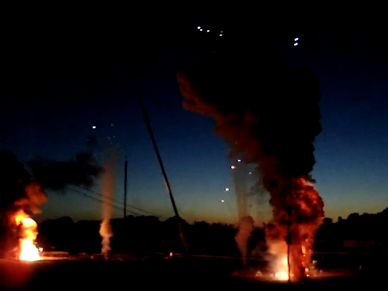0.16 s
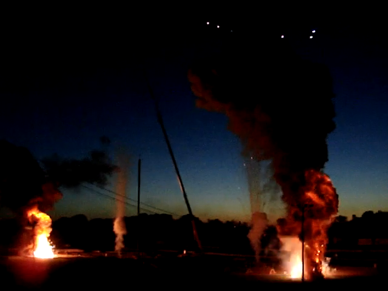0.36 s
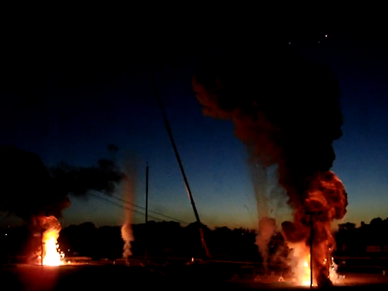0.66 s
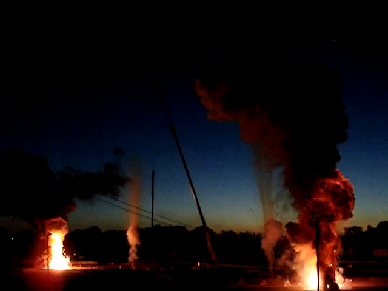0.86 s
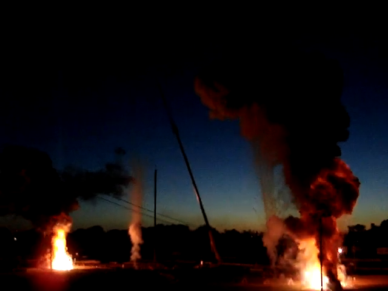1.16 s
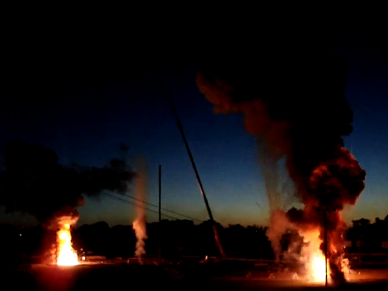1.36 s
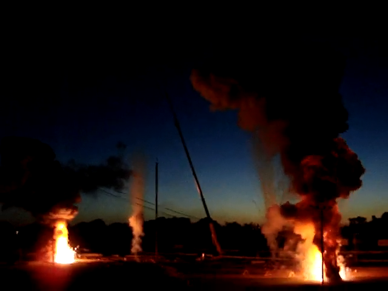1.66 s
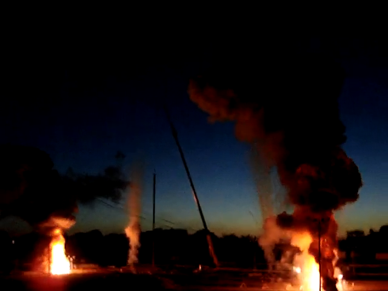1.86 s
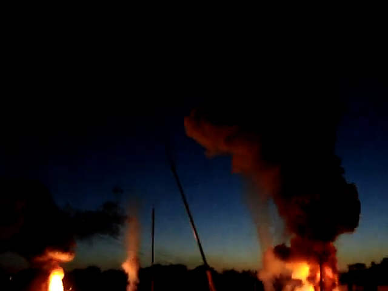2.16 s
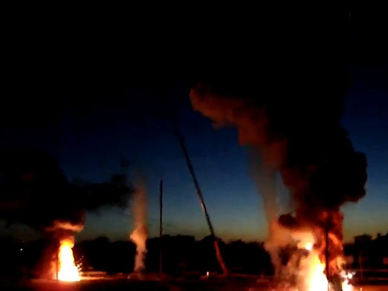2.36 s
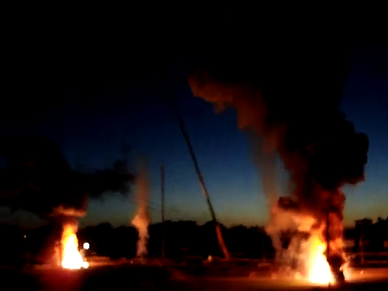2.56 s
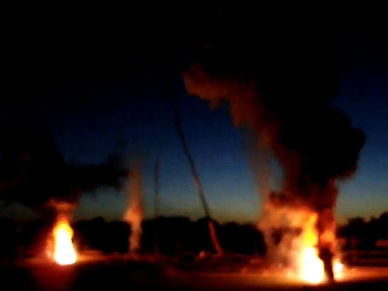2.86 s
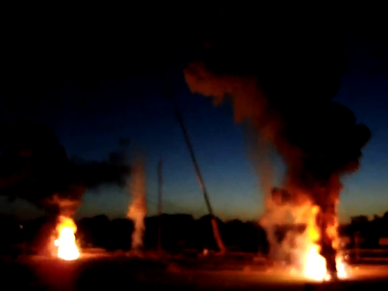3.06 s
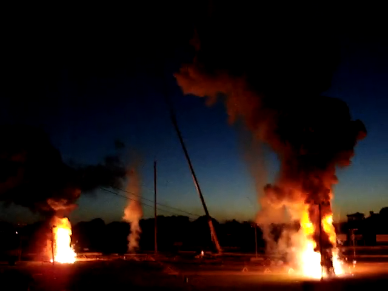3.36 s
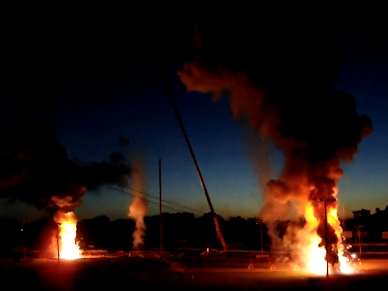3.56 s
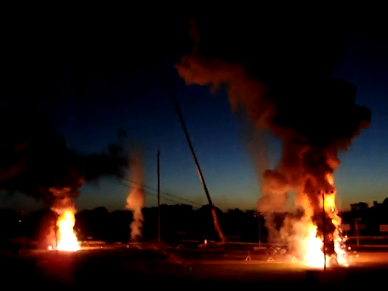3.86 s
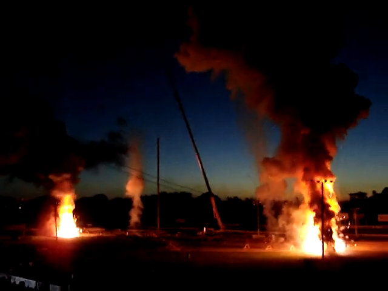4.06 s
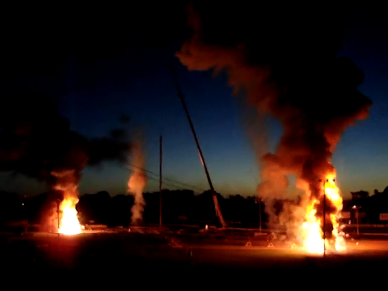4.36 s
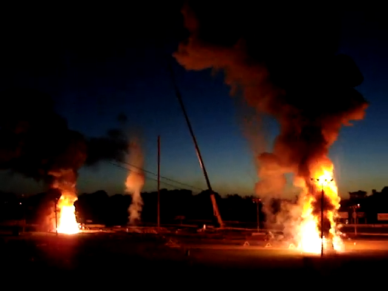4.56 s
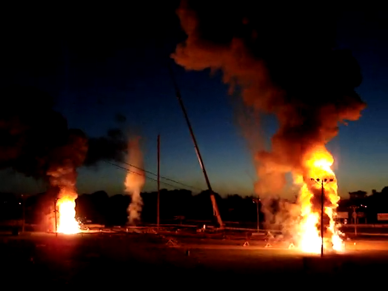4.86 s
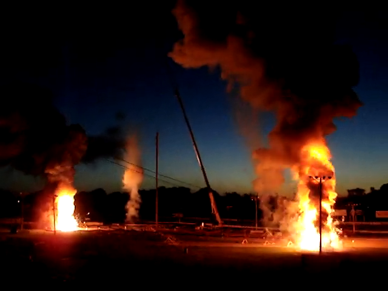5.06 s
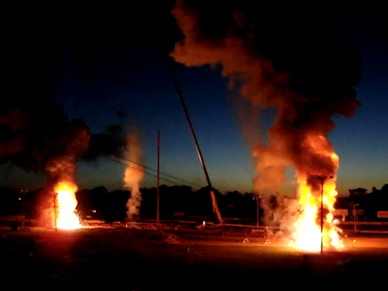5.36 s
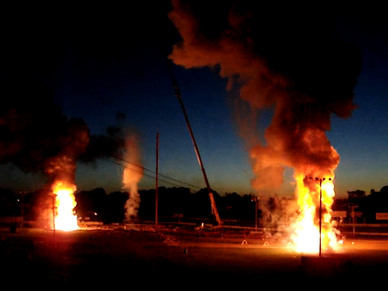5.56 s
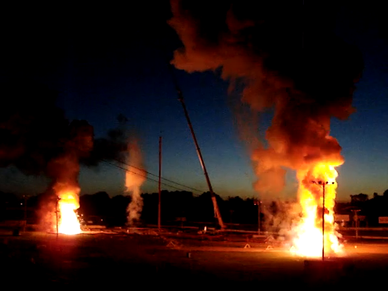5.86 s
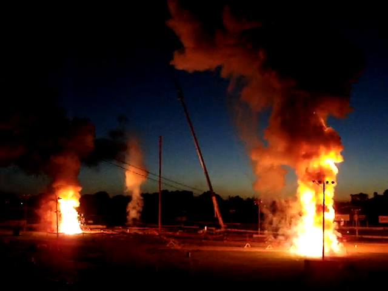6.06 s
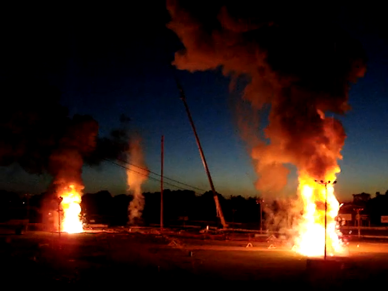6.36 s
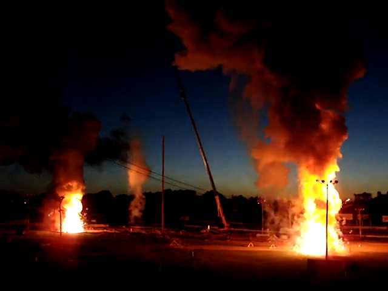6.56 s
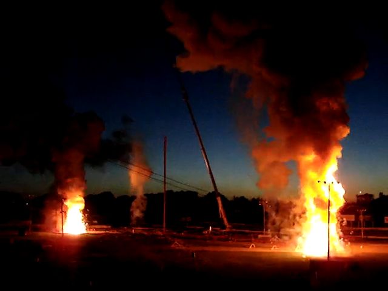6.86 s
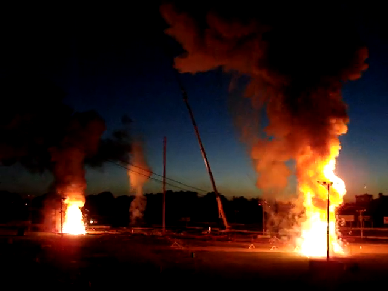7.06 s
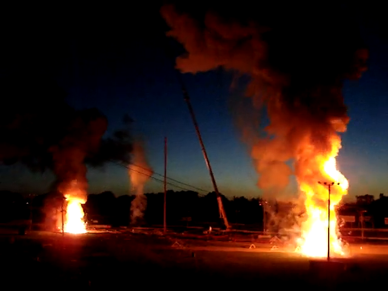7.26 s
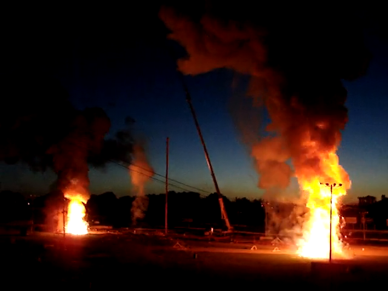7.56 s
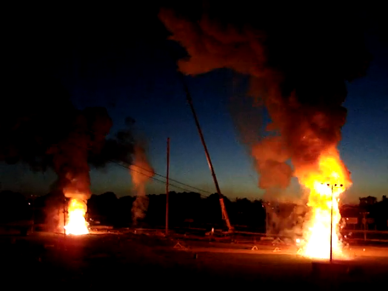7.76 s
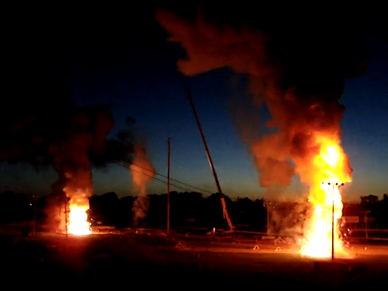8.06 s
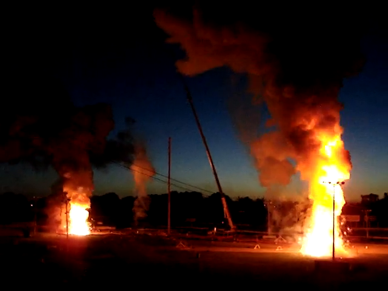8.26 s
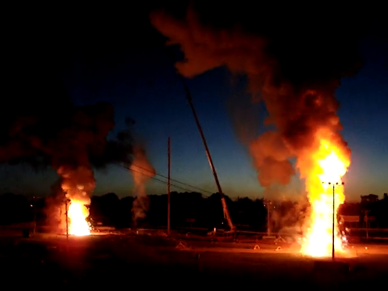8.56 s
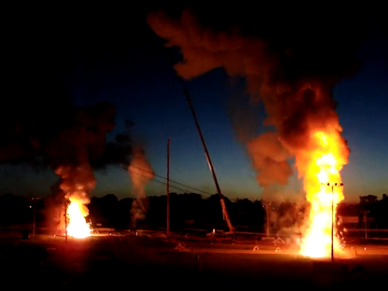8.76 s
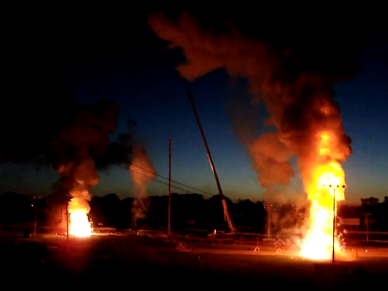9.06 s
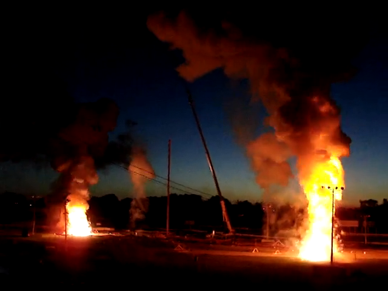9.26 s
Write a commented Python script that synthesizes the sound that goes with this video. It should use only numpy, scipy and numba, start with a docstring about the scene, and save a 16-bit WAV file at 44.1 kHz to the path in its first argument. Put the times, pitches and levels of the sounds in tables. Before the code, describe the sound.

From 0 s, huge hanging strings of firecrackers are already burning at full force on an open field, thousands of dry snaps per second fused into a harsh, dense, ripping roar. Between about 0.15 and 0.9 s eight louder bangs stand out in an uneven cluster, each a short low thump with a brief crack of noise; dull thudding underneath is heaviest here and soon eases. From 1 to 6 s the roar holds nearly steady with tiny random surges, its treble colouring sliding gradually as the camera turns. The nearer cracks slowly blend into the farther mass, becoming smoother and hissier toward 8 s, with a slight dip near 8.4 s. A faint deep rumble swells around 8 s. Near 8.9 s the crackle lifts again, sharper, and continues to the end at about 9.4 s. The small microphone is bass-thin, midrange-heavy and mildly overloaded, with flickering treble and a diffuse outdoor tail.

```python
"""Huge strings of firecrackers

Hanging strings of firecrackers burn on an open field: thousands of random clicks a second merge into a roar.
A few louder bangs, each a low overload thump with a crack of noise, stand out early on; the overload's dull
thudding, made of random pulses, and a rumble lie below. The hand-held camera turns, which shifts the short
reflections and a treble notch in the sound of the strings. Its small microphone cuts their bass, and its
input overloads a little, more on one side of the wave."""
import sys
import numpy as np
from scipy import signal
from scipy.fft import rfft, irfft
from scipy.io import wavfile
from numba import njit

SR = 44100
rng = np.random.default_rng(int(sys.argv[2]) if len(sys.argv) > 2 else 0)


def unload_audio(sound):
    """Save the sound as a 16-bit wav file, at the path given as the first command line argument."""
    columns = np.transpose(np.atleast_2d(sound))
    # keep every value between -1 and 1, then stretch to whole-number steps
    steps = np.round(np.clip(columns, -1, 1) * 32767)
    wavfile.write(sys.argv[1], SR, steps.astype(np.int16))


N = 414540
TIME = np.arange(N) / SR  # seconds


def gain_of(db):
    """Turns decibels into a pressure factor."""
    return 10 ** (np.asarray(db) / 20)


def evened(x):
    """Scales a sound to an average strength (rms) of 1."""
    return x / np.sqrt(np.mean(x ** 2) + 1e-20)


def curve(rows):
    """Joins the values of a table by straight lines in time."""
    times_s, values = np.transpose(rows)
    return np.interp(TIME, times_s, values)


def add(mix, start_s, sound):
    """Lays a sound into the mix at a given time."""
    start = max(round(start_s * SR), 0)
    part = mix[start:][:len(sound)]
    part += sound[:len(part)]


def wander(rate_hz):
    """Makes a random curve of rms 1; changes faster than the given rate are weakened."""
    spectrum = rfft(rng.standard_normal(N))
    freq_hz = np.fft.rfftfreq(N, 1 / SR)
    return evened(irfft(spectrum / (1 + (freq_hz / rate_hz) ** 2), N))


def colour(x, points, size=2048):
    """Filters to a given spectrum without sounding ahead, so that clicks keep their sharp front."""
    pitch_hz, level_db = np.transpose(points)
    freq_hz = abs(np.fft.fftfreq(size, 1 / SR))
    log_gain = np.log(gain_of(np.interp(np.log(freq_hz + 1), np.log(pitch_hz), level_db)))
    # the Hilbert transform gives the phase that puts the energy as early as possible
    taps = np.fft.ifft(np.exp(np.conj(signal.hilbert(log_gain)))).real
    return signal.oaconvolve(x, taps[:size // 2])[:len(x)]


def cut(x, edge_hz, kind, order=2):
    """Keeps what lies above ("high") or below ("low") the edge."""
    sections = signal.butter(order, min(edge_hz, SR / 2 - 1), kind, fs=SR, output="sos")
    return signal.sosfilt(sections, x)


@njit
def smooth(x, keep):
    """Smooths with a one-step memory that may change from sample to sample."""
    out = x.copy()
    for i in range(1, len(x)):
        out[i] = keep[i] * out[i - 1] + (1 - keep[i]) * x[i]
    return out


def resonate(x, centre_hz, width_hz):
    """Picks out a band with gain 1 at a centre that may move: shift it to 0 Hz, smooth, shift back."""
    spin = np.exp(2j * np.pi * np.cumsum(centre_hz) / SR)
    keep = np.exp(-np.pi * abs(width_hz) / SR)
    return 2 * (spin * smooth(x / spin, keep)).real


def random_pulses(per_s, spread_db, clumping, clump_hz, suction=0.57, shortest_s=.0002, longest_s=.002):
    """Pulses of uneven size at random moments, in clumps, as a fuse fires crackers."""
    rate_per_s = per_s * np.exp(clumping * wander(clump_hz))
    size = gain_of(spread_db * np.clip(rng.standard_normal(N), -2, 2))
    fronts = size * (rng.random(N) < rate_per_s / SR)
    # suction follows each front after its own delay, so that cracks differ in colour
    delay = SR * (shortest_s + (longest_s - shortest_s) * rng.random(N))
    arrival = np.arange(N) + delay.astype(int)
    waves = fronts - suction * np.bincount(arrival, fronts)[:N]
    return evened(waves - waves.mean())


# Colour of the overload's low thudding: pitch_hz [Hz], level_db [dB per Hz, relative]
THUD_COLOUR = [(25, -14), (60, -11), (130, -1.5), (185, -9), (260, 1.5), (350, 3.5), (600, -15),
               (2000, -52.5)]
# Level of the deep rumble, which swells late: time_s [s], level_db [dB]
RUMBLE_LEVEL = [(0, -62), (1.5, -69), (3.8, -59.5), (5.8, -61), (7.9, -53.5), (9.4, -60)]
# Thudding: settled level [dB], extra level at the start [dB], time in which the extra drops away [s]
THUD_DB, THUD_EARLY_DB, THUD_FADE_S = -52.5, 4.5, 1.0


def low_end(rumble_hz=65):
    """Dull low thudding of the overloaded input, heavier at first, as random pulses over low-passed noise."""
    pulses = random_pulses(per_s=2200, spread_db=4, clumping=0.27, clump_hz=10, suction=0)
    thudding = evened(colour(pulses, THUD_COLOUR))
    rumble = evened(cut(rng.standard_normal(N), rumble_hz, "low"))
    thud_db = THUD_DB + THUD_EARLY_DB * np.exp(-(TIME / THUD_FADE_S) ** 2)
    return gain_of(thud_db) * thudding + gain_of(curve(RUMBLE_LEVEL)) * rumble


# Colour of a crack, in the bangs and in the strings: pitch_hz [Hz], level_db [dB per Hz, relative]
CRACK_COLOUR = [(500, -3.5), (680, -6), (880, -5.5), (1100, 0.5), (1350, -1), (1700, -0.3), (2000, -4),
                (2800, -4.5), (3900, -4), (4800, -6.5), (6000, -8.5), (7200, -10.5), (9300, -6),
                (9900, -20)]
# The loudest bangs: time_s [s], thump_peak_db [dB, peak of the low thump]
LOUD_BANGS = [(0.166, -35), (0.32, -32), (0.394, -25), (0.569, -34), (0.593, -33), (0.704, -27),
              (0.734, -32), (0.859, -26)]


def bangs(thump_s=0.00039, crack_boost_db=17, crack_fade_s=0.0013, size=1024):
    """Loudest bangs: a low thump of the overloaded input, swinging back, with a brief crack of noise."""
    out, t = np.zeros(N), np.arange(size) / SR
    thump = cut((1 - t / thump_s / 2) * np.exp(-t / thump_s / 2), 400, "low")
    thump = thump / thump.max()
    for time_s, thump_peak_db in LOUD_BANGS:
        noise = rng.standard_normal(size) * np.exp(-t / crack_fade_s)
        crack = cut(colour(noise, CRACK_COLOUR), 500, "high", order=4)
        bang = thump + gain_of(crack_boost_db) * crack
        add(out, time_s - .0012, gain_of(thump_peak_db) * bang)  # begins a little ahead of its table time
    return out


def field(x, t60_s):
    """Ground and trees scatter each crack into a diffuse, dull tail: noise that follows a fading power."""
    keep = np.exp(-np.log(10 ** 6) / (t60_s * SR))  # the power falls by 60 dB in t60_s
    power = signal.lfilter([1 - keep], [1, -keep], x ** 2, zi=[np.mean(x ** 2)])[0]
    return evened(cut(np.sqrt(power) * rng.standard_normal(N), 11000, "low", order=1))


def flicker(x, depth_db=1.74, rate_hz=110, above_hz=6000):
    """The treble flickers quickly: its level wanders at random."""
    freq_hz = np.fft.rfftfreq(N, 1 / SR) + 1  # 1 Hz added to avoid dividing by zero
    treble = irfft(rfft(x) / (1 + (above_hz / freq_hz) ** 10), N)
    return x + (gain_of(depth_db * wander(rate_hz)) - 1) * treble


# The camera swings round once, then settles: time_s [s], turn [0-1]
CAMERA_TURN = [(0, 0.02), (1, 0.08), (3, 0.7), (5.8, 1)]
# Reflections close to the microphone: delay_before_s [s], delay_after_s [s] (the turn),
# share_before, share_after [share of the direct pressure; negative is upside down]
NEAR_REFLECTIONS = [(0.00095, 0.001267, 0.11, 0.037), (0.001806, 0.0023, -0.085, -0.039),
                    (0.00147, 0.001796, 0.057, 0.037), (0.0031, 0.0031, 0.068, -0.0058),
                    (0.00079, 0.00081, -0.03, 0.036)]
# Level of the top treble, around 8700 Hz: time_s [s], level_db [dB]
TREBLE_LEVEL = [(0, -5), (2, -5.5), (4.3, -2), (5.8, -3), (7, 0), (8.3, 1), (9.4, -4)]
# The turn slides a treble notch down; the slide is over at this share of the turn
NOTCH_FROM_HZ, NOTCH_TO_HZ, NOTCH_SETTLED = 9150, 7190, 0.74


def camera_body(x):
    """Short reflections and a treble notch slide as the camera turns; the microphone passes little bass."""
    turn, heard = curve(CAMERA_TURN), x.copy()
    for delay_before_s, delay_after_s, share_before, share_after in NEAR_REFLECTIONS:
        delay_s = delay_before_s + (delay_after_s - delay_before_s) * turn
        share = share_before + (share_after - share_before) * turn
        heard += share * np.interp(TIME - delay_s, TIME, x)
    notch_hz = np.interp(turn, [0, NOTCH_SETTLED], [NOTCH_FROM_HZ, NOTCH_TO_HZ])
    notch_width_hz = 2200 - 1100 * np.clip(turn, 0, 1)  # narrows over the whole turn
    heard -= 0.49 * resonate(heard, notch_hz, notch_width_hz)  # about halves the pressure at its centre
    top_treble = resonate(heard, np.full(N, 8700), np.full(N, 3000))
    heard += (gain_of(curve(TREBLE_LEVEL)) - 1) * top_treble
    return cut(heard, 557, "high", order=7)


# How hard the strings burn, a slow ebb with a late flare: time_s [s], level_db [dB]
BLAZE_LEVEL = [(0, -14.5), (0.15, -13.8), (1, -13), (2.6, -14), (3.1, -14.5), (3.6, -14), (4.1, -14.7),
               (4.9, -14), (6, -14.5), (6.7, -14.5), (8.4, -15.5), (8.78, -15), (8.92, -14), (9.4, -14)]
# Strength of the near string's sharp cracks against the roar: time_s [s], level_db [dB]
SHARP_LEVEL = [(0, 3.5), (2, 3), (4, 1.5), (6, 1), (8, -1.5), (9.4, 1.5)]
# The fuses race and stall at random: typical depth [dB], rate above which the changes weaken [Hz]
SURGE_DB, SURGE_HZ = 0.24, 14


def strings():
    """Sharp cracks of the near string over the roar of the farther ones and the field's echo."""
    near = random_pulses(per_s=1700, spread_db=2.5, clumping=.2, clump_hz=50.0)
    far = random_pulses(per_s=6000, spread_db=3, clumping=.1, clump_hz=39.8)
    echo = field(near + far, t60_s=0.87)
    roar = evened(far + gain_of(-2) * echo)
    cracks = colour(roar + gain_of(curve(SHARP_LEVEL)) * near, CRACK_COLOUR)
    heard = evened(camera_body(flicker(cracks)))
    level_db = curve(BLAZE_LEVEL) + SURGE_DB * wander(SURGE_HZ)
    return gain_of(level_db) * heard


def scene():
    """Adds up the low end, the bangs and the strings, in one channel."""
    return (low_end() + bangs() + strings())[None]


def record(dry, lopsided=0.18, ceiling=.65, edge_hz=10100):
    """The input rounds off the peaks and squeezes the positive side of the wave; then the treble is cut off."""
    bent = dry / (1 + (dry / ceiling) ** 6) ** (1 / 6)
    squeeze = lopsided * bent ** 2
    bent = bent - cut(squeeze - squeeze.mean(), 28, "high", order=1)
    lowpass = signal.firwin(701, edge_hz, window=("kaiser", 9), fs=SR)
    return signal.oaconvolve(bent, lowpass[None], "same")


dry = scene()
out = record(dry)
unload_audio(out)
```